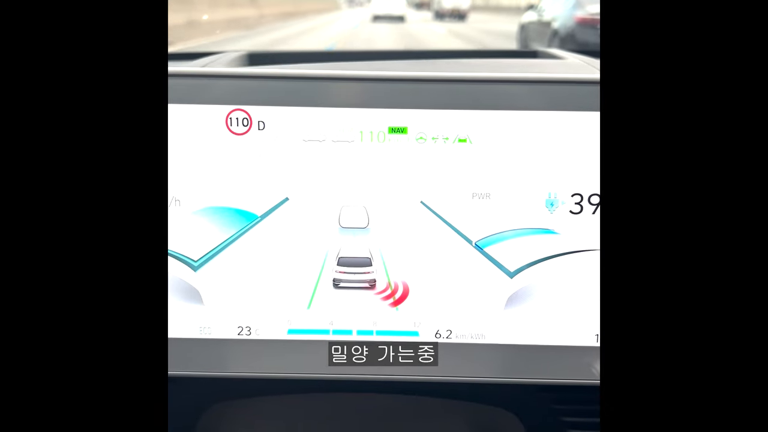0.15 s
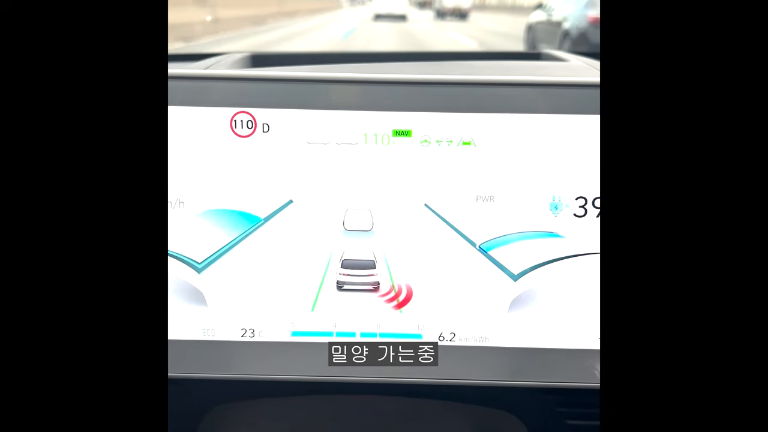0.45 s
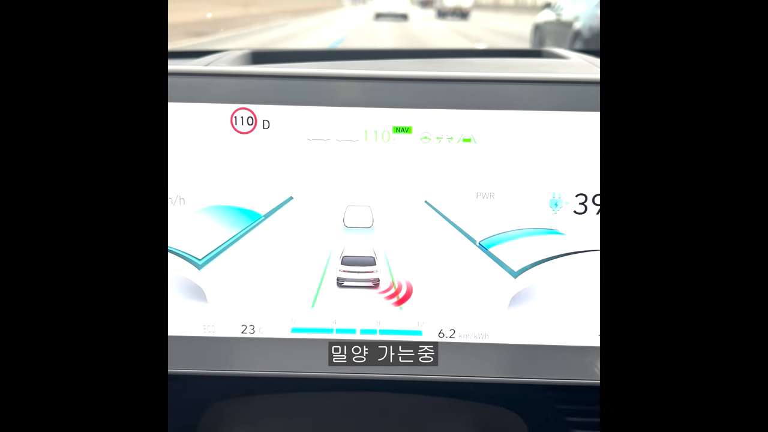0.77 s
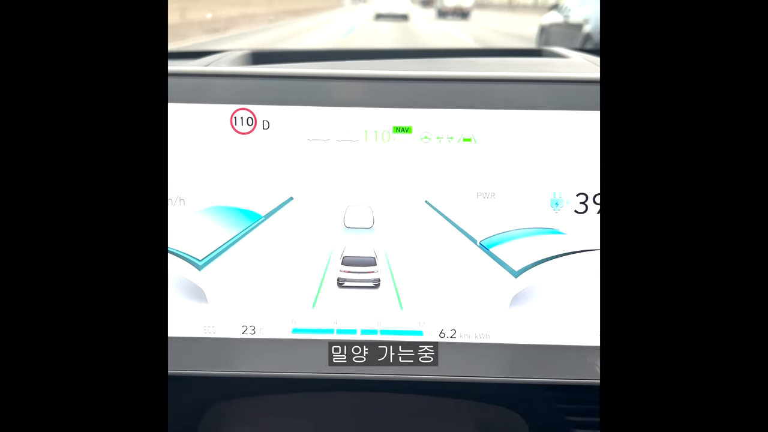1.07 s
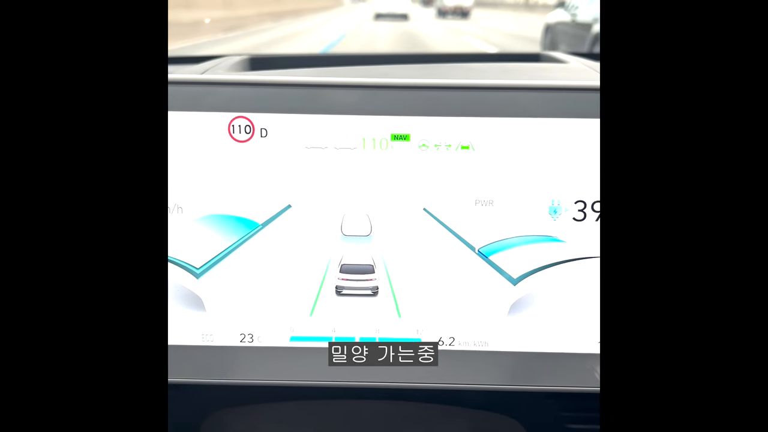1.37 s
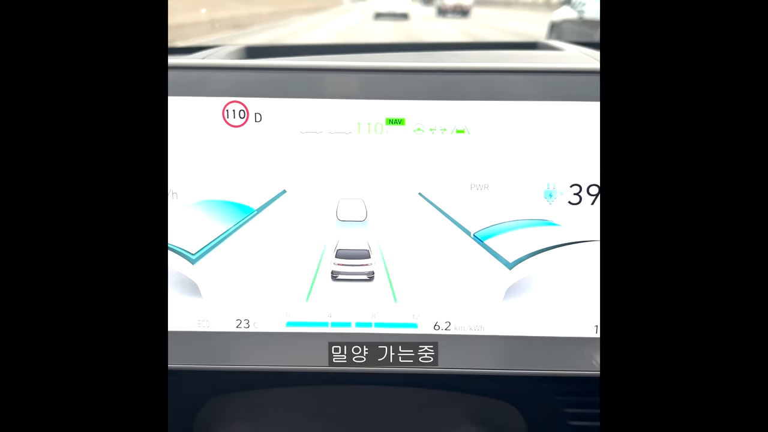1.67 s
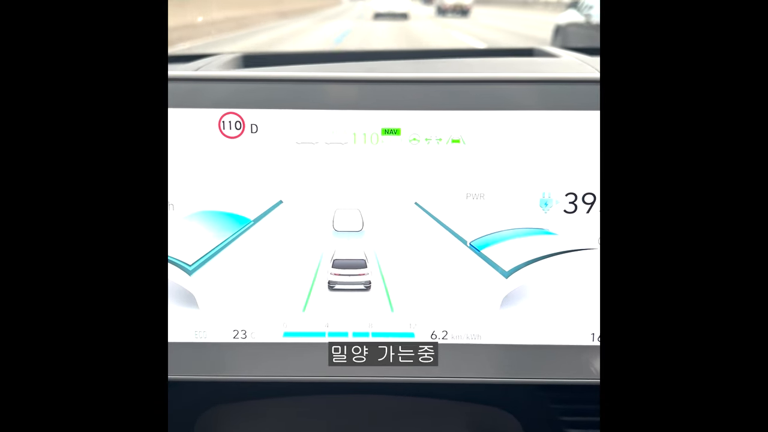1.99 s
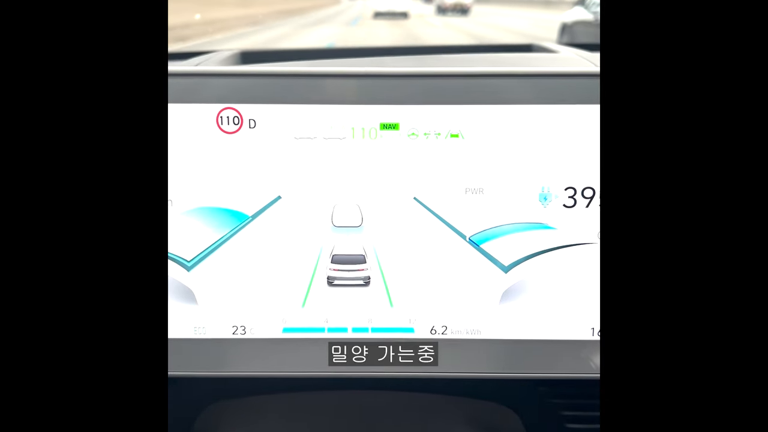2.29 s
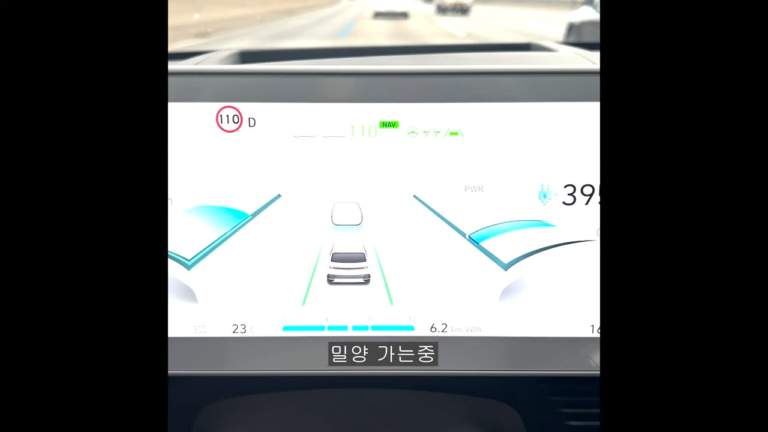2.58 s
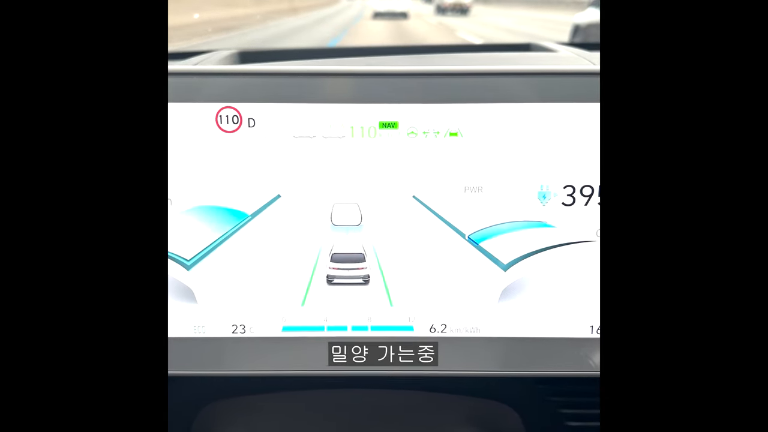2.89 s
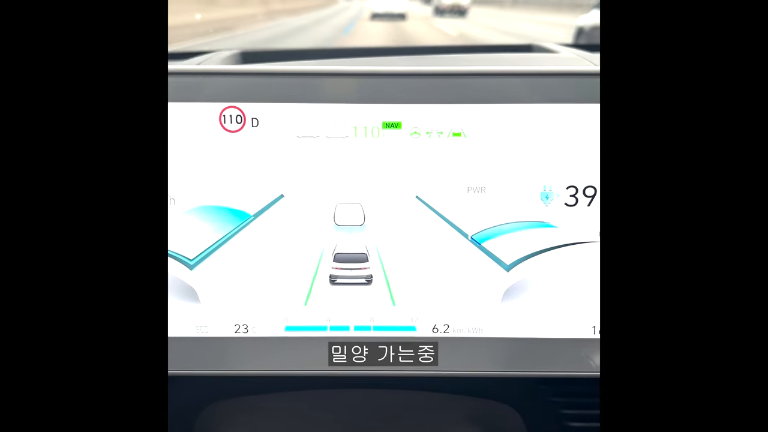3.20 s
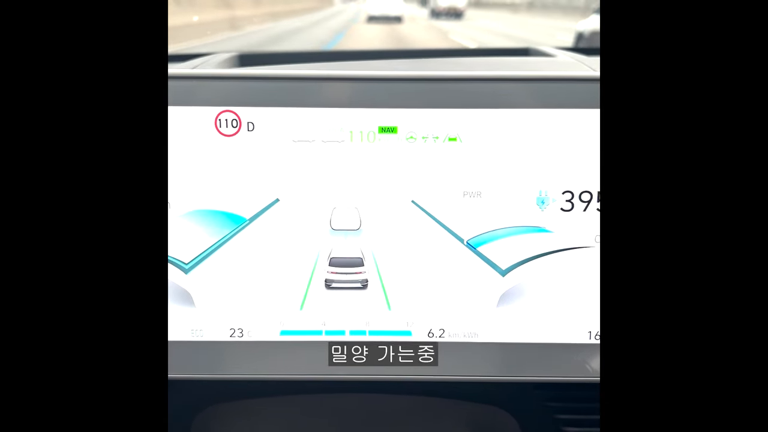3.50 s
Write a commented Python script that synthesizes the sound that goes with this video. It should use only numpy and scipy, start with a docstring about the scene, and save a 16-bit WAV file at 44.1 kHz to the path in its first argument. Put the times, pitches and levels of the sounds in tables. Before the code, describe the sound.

Deep continuous road rumble fills a closed car cabin, with a wavering tyre drone, uneven low throbs and muffled tread roar; air hiss is very faint. Close hand-held stereo microphone behind the steering wheel.

```python
"""Sound inside a car at highway speed

Heard from a hand-held camera behind the steering wheel: a deep rumble of the body, a tyre drone near 120 Hz,
hollow cabin tones, tread roar and air hiss, each a band of coloured noise under a level curve.
Modulated sines add the drone's hum, short low throbs, one tiny squeak and a whine that flutters with the lows.
Faint rustles close by are enveloped, grainy noise over a soft sliding."""
import sys
import numpy as np
from scipy import signal
from scipy.fft import rfft, irfft, next_fast_len
from scipy.io import wavfile
from scipy.ndimage import uniform_filter1d, map_coordinates

SR = 44100
rng = np.random.default_rng(int(sys.argv[2]) if len(sys.argv) > 2 else 0)


def output_pcm(signal):
    """Save a mono or channel-first signal as 16-bit PCM at the path in sys.argv[1].

    Samples are clipped to [-1, 1] before scaling.
    """
    pcm = np.clip(np.atleast_2d(signal).T, -1, 1) * 32767
    wavfile.write(sys.argv[1], SR, np.round(pcm).astype(np.int16))


N = 160965

# Level curves of the noise layers: time_s, level_db
# body rumble
RUMBLE_LEVEL = [(0, -26), (.2, -19.5), (.42, -21), (.65, -21.5), (1.2, -25), (1.7, -23), (2.3, -22.5),
                (2.7, -21.5), (3.05, -23.5), (3.3, -19), (3.52, -23), (3.65, -23.5)]
# tyre drone, hum included
DRONE_LEVEL = [(0, -25.5), (.17, -23), (.4, -23), (.7, -23), (1.0, -23.5), (1.5, -22), (1.7, -22.5),
               (1.95, -22.5), (2.1, -26), (2.35, -23), (2.95, -23), (3.25, -19), (3.55, -26)]
# hollow mid tones of the cabin
BOOM_LEVEL = [(0, -31.5), (.45, -30.5), (1.0, -33), (1.5, -31), (2.1, -34), (2.65, -30.5), (3.25, -31.5),
              (3.5, -38), (3.65, -34.5)]
# tread roar
ROAR_LEVEL = [(0, -37.5), (.5, -37.5), (1.1, -38.5), (1.6, -38), (2.1, -38.5), (2.6, -38), (3.15, -36.9),
              (3.42, -39), (3.65, -38)]
# air hiss
AIR_LEVEL = [(0, -58.5), (.6, -58), (.95, -58), (1.13, -59.5), (1.35, -58.5), (1.9, -59.5), (2.4, -58),
             (2.9, -58), (3.33, -58.5), (3.45, -54.5), (3.65, -58)]
# thin sizzle on top of the air
SIZZLE_LEVEL = [(0, -85.5), (1.1, -95), (1.8, -86.5), (2.5, -79.5), (2.95, -75), (3.3, -79), (3.65, -76)]
# soft sliding under the rustles
SLIDE_LEVEL = [(0, -87.5), (.65, -84), (.85, -99), (1.8, -96), (3.25, -89), (3.38, -78.5), (3.52, -67),
               (3.58, -70), (3.65, -72)]

# Spectral shapes, relative because each noise is scaled to rms 1: frequency_hz, density_db (per Hz)
# body rumble
RUMBLE_SPECTRUM = [(10, -40.5), (22, -16), (32, -6.5), (44, 1.5), (54, -3), (64, -1.9), (82, -0.3),
                   (105, -3.5), (150, -17), (300, -47.5), (1200, -130)]
# noise part of the tyre drone
DRONE_SPECTRUM = [(60, -31.5), (80, -12.5), (94, -9), (106, -4), (118, -2), (131, 0.5), (160, -3.5),
                  (190, -7.5), (225, -17), (400, -85), (900, -130)]
# hollow mid tones of the cabin
BOOM_SPECTRUM = [(130, -31.5), (200, -11), (232, -3), (272, 1), (312, -5), (345, -2), (385, -10),
                 (408, -8.5), (425, -6.5), (500, -19), (700, -39), (2500, -130)]
# tread roar
ROAR_SPECTRUM = [(200, -19), (430, -5), (500, -3), (550, 0.5), (630, 1.5), (780, -.5), (950, -3.5),
                 (1200, -10), (1530, -14.5), (1800, -23), (2400, -27.5), (4000, -49.5), (12000, -120)]
# air hiss
AIR_SPECTRUM = [(700, -22.5), (1500, -4.5), (2000, 2), (2700, 1), (3400, -5.5), (4700, -10.5), (5300, -20),
                (6000, -20), (7000, -24.5), (9500, -32.5), (11000, -36), (13000, -48), (16000, -55)]
# sizzle
SIZZLE_SPECTRUM = [(3000, -14.5), (4500, -2), (5900, 0.5), (6800, -2.5), (7800, -13), (11000, -35.5)]
# rustles and sliding
RUSTLE_SPECTRUM = [(1500, -28), (3500, 0.5), (5500, -3.5), (7300, 1.5), (9000, -1.5), (10500, -10),
                   (13000, -23.5), (16000, -27)]

# The sound field at the two microphone ports
# part the ports do not share, relative to the shared part: frequency_hz, level_db
DIFFUSE = [(50, -33), (120, -28), (220, -23), (340, -17), (510, -13.5), (790, -8.5), (1200, -7.5),
           (1900, -8.5), (2700, -2.5), (4500, -4.5), (6500, -4.5), (9000, -7)]
# phase by which left leads right: frequency_hz, lead_rad
PHASE_LEAD = [(40, .01), (130, .02), (220, 0), (430, .14), (600, -1.1), (720, -.9), (950, .13), (1280, .17),
              (2000, 0), (2350, 2), (3100, -.4), (4000, -1), (5200, -2), (8000, -1.4)]
# level of left minus right: frequency_hz, difference_db
BALANCE = [(40, -0.1), (125, 1.06), (300, 1.14), (500, 0), (680, 3.5), (950, 0), (1400, -2.5), (2000, 1.2),
           (8000, 0.5)]

# Centre pitch of the hum at the drone's core: time_s, pitch_hz
HUM_PITCH = [(0, 113.8), (.35, 123), (.7, 108.8), (1.22, 131), (1.52, 112.3), (1.85, 112.2), (2.2, 118.3),
             (2.5, 121.9), (2.7, 106.1), (3.25, 119.7), (3.65, 110.2)]
# Rustle strokes, level at full attack: start_s, length_s, level_db
RUSTLES = [(0.06, .008, -75), (.08, 0.0068, -70), (.12, .006, -76.5), (0.175, 0.0072, -75),
           (.202, .01, -73), (0.242, .012, -73), (0.262, .008, -68), (0.321, 0.017, -76),
           (0.53, .012, -71.5), (.546, .01, -73), (0.565, .016, -71), (.612, .01, -74), (.635, .007, -73),
           (.665, .014, -73), (.692, .006, -73), (1.93, .012, -74), (1.965, .03, -81), (3.385, .035, -70),
           (3.435, .025, -75), (3.465, .02, -58.5), (3.5, .04, -63), (3.605, .018, -67)]
# Throbs from uneven road, length at half power: middle_s, length_s, pitch_hz, glide_hz_per_s, level_db
THROBS = [(0.021, .06, 76.6, 1, -19), (0.121, .05, 113.5, 1, -21), (0.218, .11, 118.7, 121, -19.5),
          (0.335, 0.056, 121.8, 1, -19), (0.407, 0.075, 102, -100, -17), (0.514, 0.071, 74.83, -170, -19),
          (0.964, 0.076, 59, 0.5, -22), (1.08, .07, 115.2, 100.5, -20.5), (1.189, 0.043, 128, -0.5, -17.5),
          (1.458, 0.094, 116, -220, -20), (1.541, .05, 137.8, -0.5, -19.5), (1.831, .04, 113.3, 0, -17.5),
          (1.97, .035, 100, 0, -20.5), (2.096, .12, 42.99, 0, -24), (2.236, 0.083, 117.1, 200, -20),
          (2.573, 0.078, 121, -0.5, -20.5), (2.645, .04, 76.7, 1, -22), (3.4, .1, 67.92, -130, -20),
          (3.539, .08, 53, -100, -20)]

STEADY_S = .1  # span over which chance swells are evened out
HUM_WANDER_HZ, HUM_SWING_DB = 2.76, 1.5  # size of the random pitch and level changes
HUM_DB = -5.5  # hum relative to the drone's noise
LOW_TONE_LEFT_DB = 1  # left minus right, for the hum and the throbs
RUSTLE_ATTACK_S, RUSTLE_RELEASE_S, RUSTLE_GRAIN_DB = 0.0076, 0.008, 1.5
WHINE_GAIN_DB, WHINE_HZ = -81, 9590
SQUEAK_S, SQUEAK_LENGTH_S, SQUEAK_DB = .489, .028, -76
SQUEAK_HZ, SQUEAK_GLIDE_HZ_PER_S, SQUEAK_ROUGH_HZ = 7350, 12000, 320
TOP_HZ = 15300


def amp(db):
    """Decibel definition: amplitude gain is ten to the power of level over 20."""
    return 10 ** (np.asarray(db) / 20)


def unit(x):
    """Normalisation: division by the root mean square gives rms 1."""
    return x / np.sqrt(np.mean(x ** 2) + 1e-20)


def along(points, hz):
    """Interpolation of (Hz, value) points on a logarithmic frequency axis."""
    f, v = np.transpose(points)
    return np.interp(np.log(hz + 1), np.log(f + 1), v)


def curve(rows):
    """Linear interpolation of (s, value) points to one value per sample."""
    return np.interp(np.arange(N) / SR, *np.transpose(rows))


def wobble(rate):
    """Slow random modulation: a smooth curve through random knots, rate of them a second."""
    knots = rng.standard_normal(N // 20)
    return map_coordinates(knots, [np.arange(N) * rate / SR], mode="wrap")


def rush(spectrum, steady=0):
    """Partial coherence: shared and unshared coloured noise at two ports; steady (0-1) evens slow swells."""
    size = next_fast_len(N + SR // 4)
    hz = np.fft.rfftfreq(size, 1 / SR)
    a, b = rfft(rng.standard_normal((2, size))) * amp(along(spectrum, hz))
    # this angle divides the power between shared and unshared parts
    angle = np.arctan(amp(along(DIFFUSE, hz)))
    shared, unshared = a * np.cos(angle), b * np.sin(angle)
    # half of each level and phase difference goes to either port
    skew = amp(along(BALANCE, hz) / 2) * np.exp(.5j * along(PHASE_LEAD, hz))
    ports = np.array([(shared + unshared) * skew, (shared - unshared) / skew])
    pair = unit(irfft(ports, size)[:, :N])
    power = uniform_filter1d(np.mean(pair ** 2, axis=0), size=int(STEADY_S * SR))
    power = np.abs(power) + 1e-9
    return unit(pair / power ** (np.clip(steady, 0, 1) / 2))


def tilt_left(tone):
    """Interaural level difference: a tone is made slightly stronger in the left channel."""
    return tone * amp(LOW_TONE_LEFT_DB * np.array([[.5], [-.5]]))


def swell(middle, length, hz, glide, db):
    """Gaussian tone burst: a gliding sine with length at half power; hz may waver."""
    t = np.arange(N) / SR - middle
    phase = 2 * np.pi * (np.cumsum(hz + glide * t) / SR + rng.random())
    envelope = 2 ** (-2 * (t / length) ** 2)
    return amp(db) * np.sqrt(2) * envelope * np.sin(phase)


def rumble():
    """Structural vibration: the road shakes the body into deep, band-limited noise."""
    return amp(curve(RUMBLE_LEVEL)) * rush(RUMBLE_SPECTRUM, steady=0.69)


def drone():
    """Tyre drone: low noise around a hum modulated randomly in frequency and amplitude."""
    pitch = curve(HUM_PITCH) + HUM_WANDER_HZ * wobble(9)
    phase = 2 * np.pi * np.cumsum(pitch) / SR
    hum = tilt_left(unit(amp(HUM_SWING_DB * wobble(11)) * np.sin(phase)))
    noise = rush(DRONE_SPECTRUM, steady=0.7)
    return amp(curve(DRONE_LEVEL)) * unit(noise + amp(HUM_DB) * hum)


def boom():
    """Cabin boom: noise with spectral peaks gives hollow mid tones above the drone."""
    return amp(curve(BOOM_LEVEL)) * rush(BOOM_SPECTRUM, steady=0.41)


def roar():
    """Tread noise: contact with the road gives broad noise, its treble muffled by the floor."""
    level_db = curve(ROAR_LEVEL) + 0.47 * wobble(8)
    return amp(level_db) * rush(ROAR_SPECTRUM, steady=0.24)


def air():
    """Flow noise: air streaming over the windscreen and side windows gives a wavering hiss."""
    level_db = curve(AIR_LEVEL) + .5 * wobble(18)
    return amp(level_db) * rush(AIR_SPECTRUM)


def sizzle():
    """Amplitude-modulated noise: a thin high band flickers and slowly swells on top of the air."""
    level_db = curve(SIZZLE_LEVEL) + 1.5 * wobble(25)
    return amp(level_db) * rush(SIZZLE_SPECTRUM)


def whine(lows):
    """Balanced modulation: the low sound's waveform multiplies a high sine, making it flutter."""
    carrier = np.sin(2 * np.pi * WHINE_HZ * np.arange(N) / SR)
    return amp(WHINE_GAIN_DB) * unit(lows) * carrier


def rustles():
    """Friction noise: grainy brushes over soft sliding, as of a sleeve or a hand near the camera."""
    t = np.arange(N) / SR
    strokes = np.zeros(N)
    for start, length, db in RUSTLES:
        attack = np.clip((t - start) / RUSTLE_ATTACK_S, 0, 1)
        release = np.exp(-np.maximum(t - start - length, 0) / RUSTLE_RELEASE_S)
        strokes += amp(db) * attack * release
    grain = unit(amp(RUSTLE_GRAIN_DB * wobble(560)) * rush(RUSTLE_SPECTRUM))
    # strokes and sliding add in power
    return np.hypot(strokes, amp(curve(SLIDE_LEVEL))) * grain


def throbs():
    """Transient vibration: uneven road sets the body and cabin air swinging for a few cycles."""
    return tilt_left(sum(swell(*row) for row in THROBS))


def squeak():
    """Stick-slip friction: one brush catches and gives a tiny, rough, rising tone."""
    hz = SQUEAK_HZ + SQUEAK_ROUGH_HZ * wobble(900)
    return swell(SQUEAK_S, SQUEAK_LENGTH_S, hz, SQUEAK_GLIDE_HZ_PER_S, SQUEAK_DB)


def scene():
    """Superposition: the sounds in the cabin add, and the lows also drive the whine."""
    lows = rumble() + drone() + boom() + throbs()
    highs = roar() + air() + sizzle()
    return lows + highs + whine(lows) + rustles() + squeak()


def record(dry):
    """Band limitation: the camera's steep zero-phase low-pass removes the extreme treble."""
    low_pass = signal.butter(N=10, Wn=TOP_HZ, fs=SR, output="sos")
    return signal.sosfiltfilt(low_pass, dry)


dry = scene()
out = record(dry)
output_pcm(out)
```